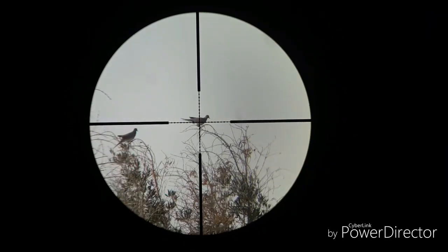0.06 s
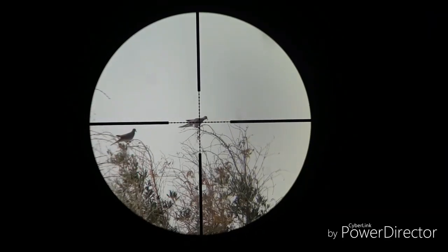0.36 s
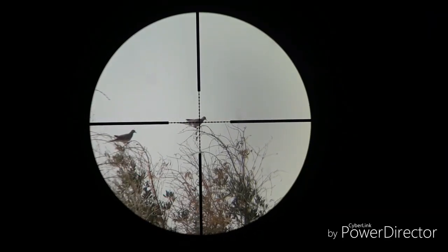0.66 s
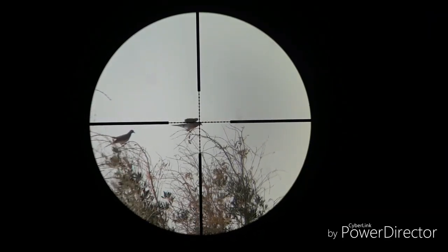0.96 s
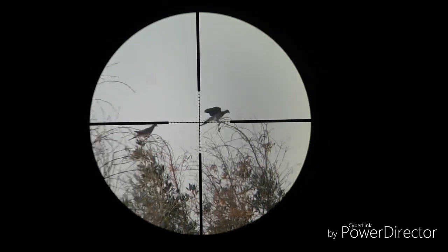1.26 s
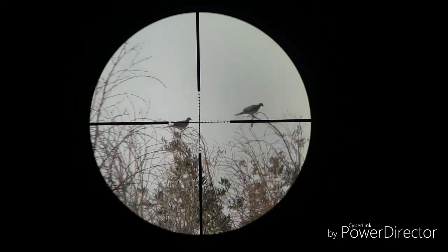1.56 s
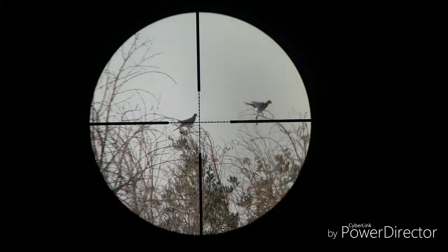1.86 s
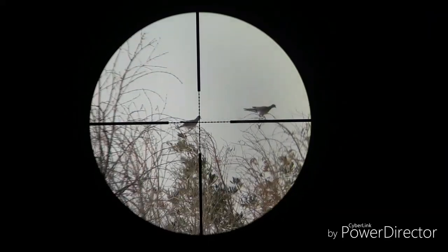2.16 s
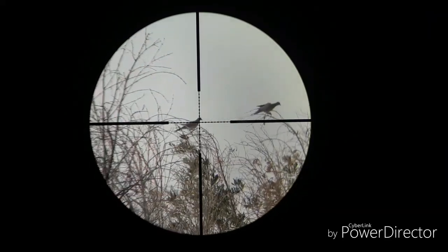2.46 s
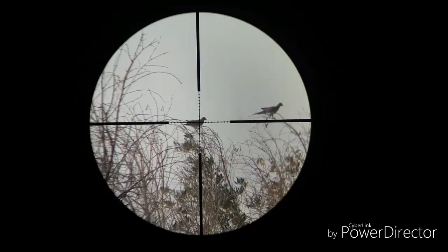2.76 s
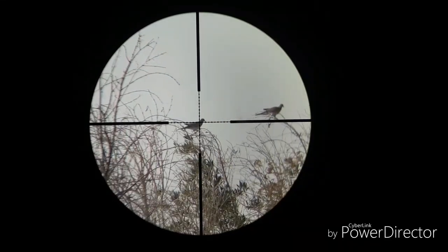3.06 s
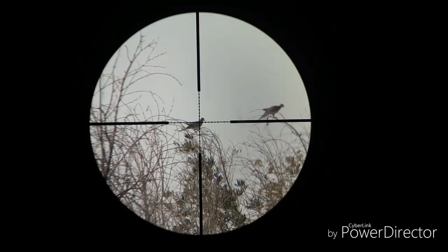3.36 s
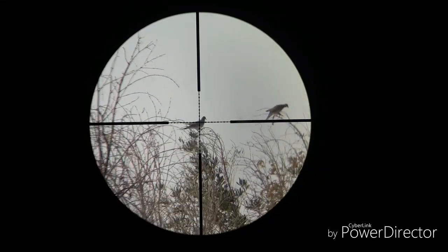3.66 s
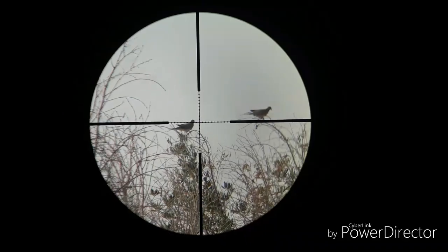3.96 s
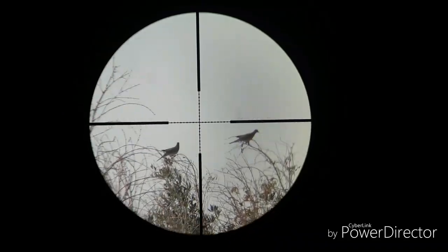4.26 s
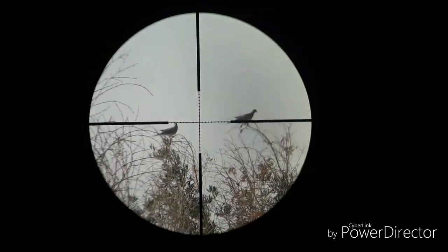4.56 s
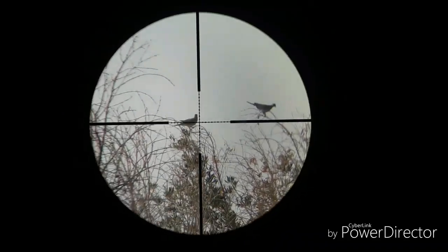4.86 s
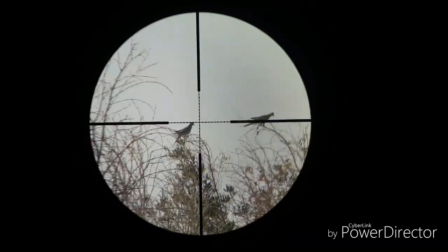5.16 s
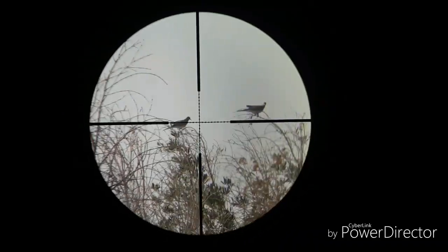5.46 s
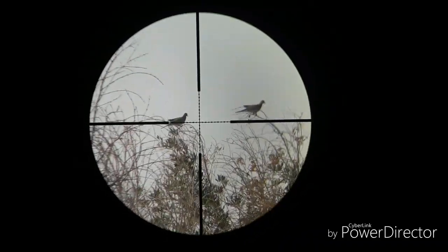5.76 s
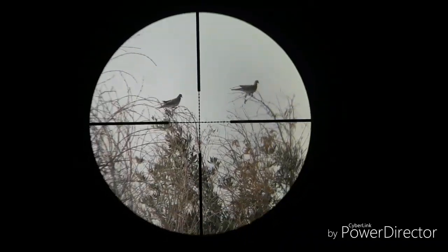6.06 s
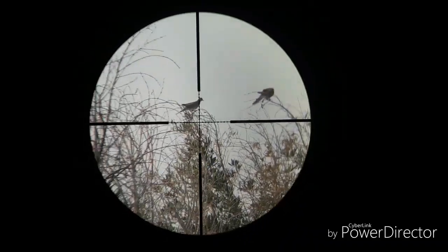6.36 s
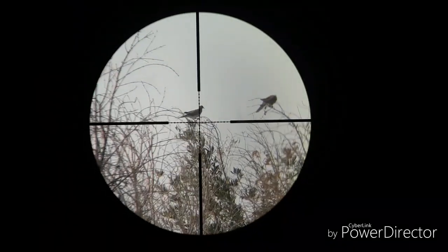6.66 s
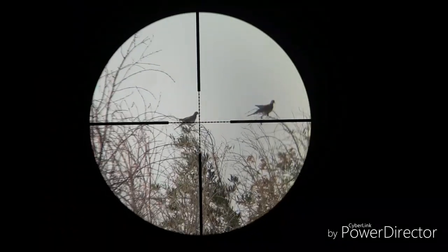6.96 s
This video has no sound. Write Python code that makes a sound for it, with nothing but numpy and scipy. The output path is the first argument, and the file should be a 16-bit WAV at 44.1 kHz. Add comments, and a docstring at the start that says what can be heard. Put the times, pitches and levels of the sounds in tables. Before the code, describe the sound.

Outdoors, a distant fan hums over a soft rush of traffic, and birds peep faintly now and then. After about four seconds, fingers rub and tap on an air rifle right by the microphone. Its steel action clicks several times, then latches with a loud snap and a brief spring ring. A short scrape and a solid knock follow, and the rubbing fades under a few last peeps.

```python
"""An air rifle is cycled outdoors, close to a microphone on its scope. From the start a far fan hums over
rushing traffic; from 1 s birds peep now and then. Near 4 s fingers rub and tap, a thin whine sinks in the
traffic, then the steel action starts to click. At 5 s it latches with the loudest snap: the spring rings
and the gain control ducks. The slide is pushed along at 5.3 s, the action knocks home at 5.7 s, and the
rubbing fades under a few last peeps."""
import sys
import numpy as np
from scipy import signal
from scipy.fft import rfft, irfft, next_fast_len
from scipy.io import wavfile
from scipy.ndimage import uniform_filter1d, minimum_filter1d, map_coordinates

SR = 44100
rng = np.random.default_rng(int(sys.argv[2]) if len(sys.argv) > 2 else 0)


def unload_audio(sound):
    """Save the sound as a 16-bit wav file, at the path given as the first command line argument."""
    columns = np.transpose(np.atleast_2d(sound))
    # keep every value between -1 and 1, then stretch to whole-number steps
    steps = np.round(np.clip(columns, -1, 1) * 32767)
    wavfile.write(sys.argv[1], SR, steps.astype(np.int16))


N = 317353


def amp(db):
    """Decibels to gain."""
    return 10 ** (np.asarray(db) / 20)


def unit(x):
    """Scale to rms 1."""
    return x / np.sqrt(np.mean(x ** 2) + 1e-20)


def gains(points, hz):
    """Gain at hz of (frequency [Hz], level [dB]) points joined on a log axis."""
    point_hz, db = np.transpose(points)
    return amp(np.interp(np.log(hz + 1), np.log(point_hz + 1), db))


def curves(rows):
    """One value per sample for each column after the time."""
    times, *columns = np.transpose(rows)
    return [np.interp(np.arange(N) / SR, times, column) for column in columns]


def wobble(rate):
    """A smooth random curve, rate knots a second."""
    knots = rng.standard_normal(int(N * rate / SR) + 4)
    return map_coordinates(knots, [np.arange(N) * rate / SR])


def filtered(x, response):
    """Filter x by a gain given as a function of frequency."""
    size = next_fast_len(N + SR // 2)
    return irfft(rfft(x, size) * response(np.fft.rfftfreq(size, 1 / SR)), size)[:N]


def noise(spectrum):
    """Coloured noise of rms 1."""
    return unit(filtered(rng.standard_normal(N), lambda hz: gains(spectrum, hz)))


def add(track, s, sound):
    """Mix a sound into the track at s seconds."""
    span = track[round(s * SR):][:len(sound)]
    span += sound[:len(span)]


def unit_hit(x):
    """Scale a short sound to the energy of 5 ms at rms 1."""
    return x / np.sqrt(np.sum(x ** 2) / (.005 * SR))


def ping(hz, t, t60):
    """One damped mode, 60 dB down after t60 seconds."""
    return amp(-60 * t / t60) * np.sin(2 * np.pi * hz * t)


def ring(modes, t, scatter_db, detune):
    """Damped modes; each contact point excites them at new strengths and signs, slightly detuned."""
    hz, db, t60 = np.transpose(modes)[:, :, None]
    size, shift, side = rng.standard_normal((3, len(modes), 1))
    strengths = np.sign(side) * amp(db + scatter_db * size)
    return np.sum(strengths * ping(hz * (1 + detune * shift), t, t60), 0)


def burst(spectrum, t, t60, tail_db, tail_t60):
    """Dense, quickly damped modes as coloured noise: a sharp burst and a weak tail."""
    white = rng.standard_normal(len(t))
    coloured = irfft(rfft(white) * gains(spectrum, np.fft.rfftfreq(len(t), 1 / SR)), len(t))
    envelope = amp(-60 * t / t60) + amp(tail_db - 60 * t / tail_t60)
    return unit_hit(coloured * envelope)


# the microphone's own noise: (frequency [Hz], relative level [dB])
HISS_SPECTRUM = [(1500, -22), (3000, 2.5), (4500, -0.5), (6800, -2.5), (8000, -19), (9500, -17),
                 (11500, -12.5), (15300, -12), (15800, -46)]
def microphone_hiss():
    """The steady noise floor of the microphone."""
    return amp(-63.0) * noise(HISS_SPECTRUM)


# traffic in the distance: (frequency [Hz], relative level [dB])
TRAFFIC_SPECTRUM = [(20, -38), (38, -30), (50, -2), (60, -7.5), (100, -0.5), (140, 0), (200, -1.5),
                    (270, 1.5), (340, -14), (450, -8), (550, -10), (880, -5.5), (1250, -6.5), (1550, -12.5),
                    (3000, -21)]
def traffic():
    """A gently wavering rush, dulled above 3 kHz by the air on its way to the microphone."""
    rush = filtered(noise(TRAFFIC_SPECTRUM), lambda hz: 1 / np.sqrt(1 + (hz / 3000) ** 6))
    return amp(-46.0 + 0.6 * wobble(2.375)) * rush


# a faint whine, far off: (time [s], pitch [Hz], level [dB])
WHINE_PATH = [(3.5, 1850, -82), (4.15, 1820, -66), (4.5, 1673, -53), (4.7, 1600, -63), (5.25, 1625, -56),
              (5.5, 1600, -95)]
def whine():
    """One thin, unsteady tone among the traffic, sinking in pitch."""
    hz, db = curves(WHINE_PATH)
    level = np.sqrt(2) * amp(db + 2 * wobble(11))
    phase = 2 * np.pi * np.cumsum(hz) / SR + .6 * wobble(40)
    return level * np.sin(phase)


# birds far from the microphone: (time [s], pitch [Hz])
BIRD_PEEPS = [(1.09, 4620), (2.251, 4030), (3.184, 2120), (3.19, 3250), (6.375, 3700), (6.452, 4060),
              (6.6, 3400)]
def birds(level_db=-60.5, length_s=0.077, pitch_fall=.03):
    """Short falling peeps, blurred by distance."""
    out = np.zeros(N)
    position = np.linspace(-1, 1, int(length_s * SR))
    envelope = amp(level_db) * np.cos(np.pi * position / 2) ** 4
    for s, hz in BIRD_PEEPS:
        phase = 2 * np.pi * np.cumsum(hz * (1 - pitch_fall * position)) / SR
        blur = (wobble(600) + 1j * wobble(600))[:len(position)]  # random strength and phase
        add(out, s - length_s / 2, envelope * np.real(blur * np.exp(1j * phase)))
    return out


# tones of a far fan: (frequency [multiple of the blade tone], relative level [dB])
FAN_TONES = [(.875, -14.5), (1, 1), (1.125, -22.5), (1.88, -20), (8.91, -25.5), (.41, -17.5)]
# slow swell of its hum at the microphone: (time [s], level [dB])
FAN_SWELL = [(0, -48), (1.3, -47.3), (2.25, -44.5), (2.5, -48), (3.0, -46.5), (3.5, -48.5), (3.8, -47),
             (7.2, -47.5)]
def fan(blade_hz=243.5, drift_hz=.4, waver_db=1.5):
    """A blade tone and weaker side tones drift with the speed and flutter on the way through the air."""
    phase = 2 * np.pi * np.cumsum(blade_hz + drift_hz * wobble(1.5)) / SR
    tones = sum(amp(db + 1.9 * wobble(9)) * np.sin(multiple * phase + 0.29 * wobble(14))
                for multiple, db in FAN_TONES)
    return np.sqrt(2) * amp(curves(FAN_SWELL)[0] + waver_db * wobble(7)) * tones


def yard_echo(x):
    """A dull scatter from the ground and the walls near the rifle."""
    t = np.arange(SR // 2) / SR
    spectrum = [(200, 9), (1300, -8.0), (5000, -11.5), (12000, -19)]
    tail = burst(spectrum, t, t60=0.26, tail_db=-20.5, tail_t60=.45)
    return signal.fftconvolve(x, tail / np.linalg.norm(tail))[:N]


# rubbing on the rifle, close up: (frequency [Hz], relative level [dB])
FRICTION_SPECTRUM = [(200, -8), (1300, 6.5), (1850, 14.5), (2600, 4.5), (4000, 3.5), (6800, -2),
                     (8200, -16), (11000, -9), (15000, -8.5), (16000, -25)]
# strokes of fingers and sliding parts: (peak time [s], level [dB], rise [s], fall [s])
RUB_STROKES = [(4.2, -47, 0.054, 0.038), (4.41, -50, .25, 0.12), (4.6, -51, .05, 0.11),
               (4.87, -53, 0.18, .3), (5.2, -56.5, .2, .1), (5.306, -32.5, 0.038, 0.027),
               (6.05, -53.5, .24, 0.69)]
def rubbing(drop_db=15):
    """Grainy friction of skin and sliding steel; a stroke moves by drop_db over its rise or fall."""
    t = np.arange(N) / SR
    pressure = sum(amp(db - drop_db * np.maximum((s - t) / rise, (t - s) / fall))
                   for s, db, rise, fall in RUB_STROKES)
    grain = amp(4 * wobble(600) + 2 * wobble(30))
    return pressure * unit(noise(FRICTION_SPECTRUM) * grain)


# handling rumble right under the microphone: (time [s], level [dB])
RUMBLE_LEVEL = [(3.0, -77), (4.2, -56), (4.82, -53.5), (4.92, -40.5), (5.02, -49.5), (5.15, -47.5),
                (5.3, -65)]
def handling():
    """The rifle rumbles dully as it shifts in the hands."""
    spectrum = [(20, -14.5), (45, -8), (100, -7.5), (200, -8), (600, -29), (3000, -70)]
    return amp(curves(RUMBLE_LEVEL)[0]) * noise(spectrum)


# the clack of small parts and the tick of a hard edge, close up: (frequency [Hz], relative level [dB])
CLACK_SPECTRUM = [(120, -18), (400, -5), (1500, -5.5), (2000, 3), (2400, -3), (3500, -1.5), (6500, -1),
                  (7400, -13), (8200, -41.5), (16000, -42)]
TICK_SPECTRUM = [(3000, -31), (7500, -1.5), (8300, -11.5), (9500, -5.5), (11500, 1), (13500, -4),
                 (15000, -6.5), (16500, -14.5)]
# modes of the steel parts, air tube and stock: (frequency [Hz], relative level [dB], t60 [s])
STEEL_MODES = [(1880, 6.5, 0.028), (2860, 2.5, 0.027), (3477, 7, 0.035), (4130, 3, 0.02),
               (4320, -1.5, 0.023), (5210, -0.5, .035), (5940, -3.5, 0.027), (6060, -5, 0.015),
               (6450, -16.5, 0.026), (7140, -16, .025)]
TUBE_MODES = [(1216, -1, 0.031), (1306, -1.5, 0.031), (1440, -5.5, 0.018), (1625, -14.5, 0.027)]
STOCK_MODES = [(360, -5, 0.027), (534, -3, 0.022), (693, 0, 0.0056), (980, -1, 0.011)]
def contact(db, edge_db, body_db, ping_hz):
    """One contact clacks, pings the struck part, rings the steel and air tube, and knocks the stock."""
    t = np.arange(SR // 5) / SR
    clack = burst(CLACK_SPECTRUM, t, t60=0.0135, tail_db=-19.5, tail_t60=0.053)
    part = unit_hit(ping(ping_hz, t, t60=0.0097))
    steel = unit_hit(ring(STEEL_MODES, t, scatter_db=0.5, detune=.002))
    tick = burst(TICK_SPECTRUM, t, t60=0.008, tail_db=-19.5, tail_t60=0.033)
    swing_up = 1 - np.exp(-t / 0.0025)  # the tube takes a moment to sound
    tube = unit_hit(ring(TUBE_MODES, t, scatter_db=-1.5, detune=.015) * swing_up)
    stock = unit_hit(ring(STOCK_MODES, t, scatter_db=2.5, detune=0.036))
    metal = amp(-3.0) * clack + amp(-4.0) * part + amp(-9.0) * steel
    knock_db = -5 + .35 * body_db  # the stock partly follows the body ring
    return amp(db) * (metal + amp(edge_db) * tick + amp(body_db) * tube + amp(knock_db) * stock)


def slide(start_s=5.264, length_s=.05, jitter_s=.0007, first_db=-39.5, rise_db=14.5, slips=8):
    """The steel slide sticks and slips in small contacts, faster and harder as the push builds."""
    out = np.zeros(N)
    for push in np.linspace(0, 1, slips) ** 0.58:
        late, size, pitch = rng.standard_normal(3)
        db = first_db + rise_db * push + size
        slip = contact(db, edge_db=-18, body_db=4, ping_hz=2700 * np.exp(.12 * pitch))
        add(out, start_s + length_s * push + jitter_s * late, slip)
    return out


# the spring inside the rifle: (frequency [Hz], relative level [dB], t60 [s])
SPRING_MODES = [(1060, -2, 0.26), (1190, -12, 0.4), (1582, -4, 0.35), (2342, -5, 0.31), (3160, -13, 0.26),
                (5280, -9, 0.14), (5776, -18, 0.24), (7220, -16, 0.16), (8390, -10, 0.15),
                (9803, -16, 0.24), (10200, -1, 0.14), (10900, -15.5, 0.13)]
def spring(latch_s=5.0245, level_db=-32.5):
    """The spring sings on after the latch catches."""
    out, t = np.zeros(N), np.arange(SR) / SR
    add(out, latch_s, sum(amp(level_db + db) * ping(hz, t, t60) for hz, db, t60 in SPRING_MODES))
    return out


# modes rung by dull knocks, close to the microphone: (time [s], frequency [Hz], level [dB], t60 [s])
KNOCK_MODES = [(4.625, 850, -19.5, 0.014), (4.714, 450, -29, 0.015), (4.8639, 680, -17.5, 0.011),
               (5.03, 360, -18.5, 0.041), (5.7464, 990, 0, 0.0071), (5.749, 1410, -9.5, 0.022),
               (5.7466, 550, -10.5, 0.026)]
def knocks():
    """Short, dull knocks in the rifle; the last heavy knock rings at three pitches."""
    out, t = np.zeros(N), np.arange(SR // 5) / SR
    for s, hz, db, t60 in KNOCK_MODES:
        add(out, s, amp(db) * ping(hz, t, t60))
    return out


# finger taps, then clicks of the action, close to the microphone:
# (time [s], strength [dB], hard edge [dB over strength], body ring [dB over strength], ping [Hz])
TAPS_AND_CLICKS = [(4.0721, -39.5, -19, -2, 4500), (4.1163, -49, -9, -1, 4590),
                   (4.162, -47.5, -22, -4, 3940), (4.2, -45, -8, 3.5, 3320), (4.232, -48.5, -5, 0, 5810),
                   (4.342, -48, 2, 8.5, 2480), (4.5664, -25, -4.5, -19, 3820),
                   (4.57, -19, -7.5, -9.5, 4950), (4.6233, -34.5, -22, -8, 3340),
                   (4.6247, -21, -10.5, -7.5, 3350), (4.7545, -47, -17, 16.5, 2610),
                   (4.7945, -34.5, -21.5, 13, 4600), (4.8625, -25, -21.5, -8, 3600),
                   (4.8706, -30.5, -8, -12, 4330), (4.874, -15.5, -6, -17, 7070),
                   (4.878, -22, -7, -3, 6290), (4.898, -35.5, -26, 9, 3490),
                   (4.9026, -28.5, -16, 3.5, 3820), (4.938, -42, -26, 1, 5250),
                   (5.007, -41.5, -23, 6, 2520), (5.0207, -16, -0.5, -10, 5340),
                   (5.0245, -11, -4.5, -6, 4460), (5.0293, -16.5, -19, 2, 3450),
                   (5.0375, -20.5, -19.5, -2.5, 3500), (5.051, -35, -11, 2, 2670),
                   (5.17, -44.5, -10, 5.5, 5750), (5.3253, -19.5, -10, -19, 5300),
                   (5.335, -20.5, -7, -9, 6500), (5.351, -27, -28, -1, 5500), (5.7301, -30, -15, -1, 6900),
                   (5.738, -17.5, -11.5, -10, 4590), (5.7466, -18.5, -22, 5.5, 2420),
                   (6.32, -42.5, -35, -2, 4520)]
def taps_and_clicks():
    """Fingers tap lightly on the rifle, then its steel action clicks and latches."""
    out = np.zeros(N)
    for s, db, edge_db, body_db, ping_hz in TAPS_AND_CLICKS:
        add(out, s, contact(db, edge_db, body_db, ping_hz))
    return out


def radiated(x, corner_hz):
    """A slim rifle radiates little bass."""
    return signal.sosfilt(signal.butter(3, corner_hz, "highpass", fs=SR, output="sos"), x)


def scene():
    """One microphone outdoors: rifle and hands close by, a faint echo, the rest far off."""
    rifle = radiated(taps_and_clicks() + knocks() + slide() + spring(), corner_hz=250)
    near = rifle + amp(-29.0) * yard_echo(rifle) + rubbing() + handling()
    far = fan() + birds() + whine() + traffic()
    return (near + far + microphone_hiss())[None]


def gain_control(x, threshold_db, depth_db, hold_s, release_s):
    """A loud, bright snap turns the gain down at once; it stays down a while, then recovers."""
    bright = filtered(x, lambda hz: hz > 2000)
    power = np.abs(uniform_filter1d(bright ** 2, size=SR // 60))
    level_db = 10 * np.log10(power + 1e-12)
    needed_db = np.clip(2 * (threshold_db - level_db), -depth_db, 0)
    span = int(hold_s * SR) // 2 * 2 + 1
    held_db = minimum_filter1d(needed_db, span, origin=span // 2)
    pole = np.exp(-1 / (release_s * SR))
    recovering_db = signal.lfilter([1 - pole], [1, -pole], held_db)
    return x * amp(np.minimum(held_db, recovering_db))


def record(dry):
    """Behind the microphone: gain control, soft overload and a steep band limit."""
    ceiling, top_hz = .85, 16100
    x = gain_control(dry[0], threshold_db=-15, depth_db=5.5, hold_s=0.73, release_s=0.063)
    x = x / (1 + (x / ceiling) ** 4) ** (1 / 4)
    return filtered(x, lambda hz: 1 / (1 + (hz / top_hz) ** 120))[None]


dry = scene()
out = record(dry)
unload_audio(out)
```